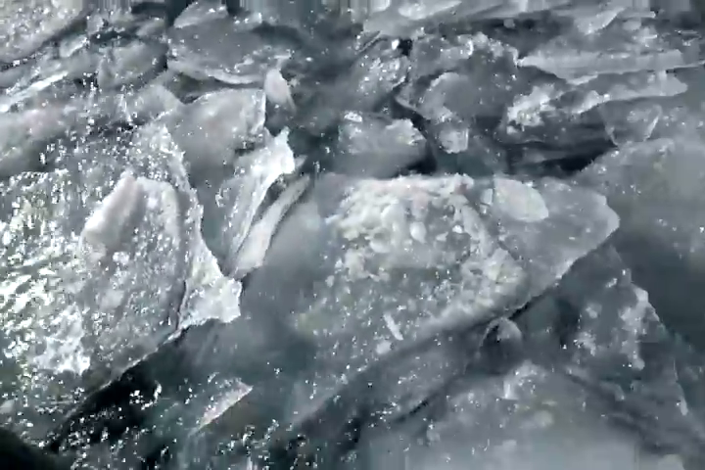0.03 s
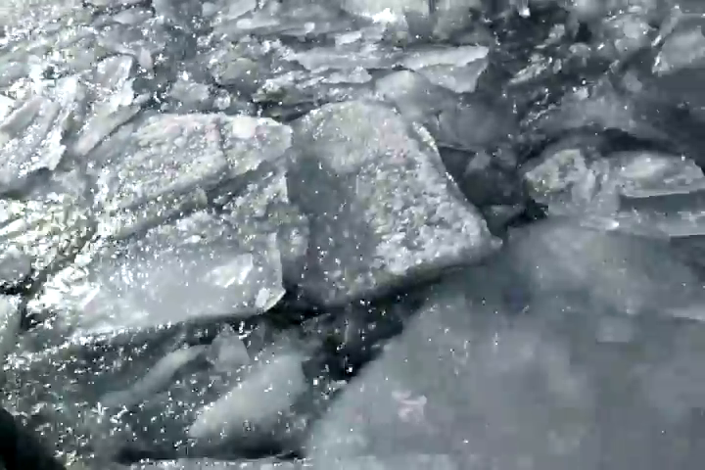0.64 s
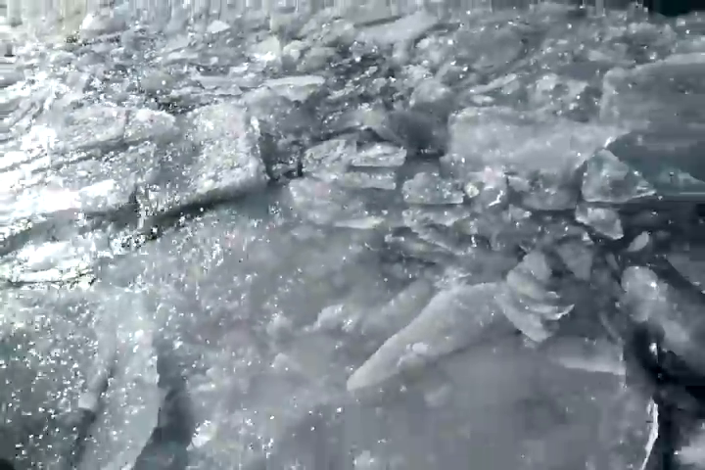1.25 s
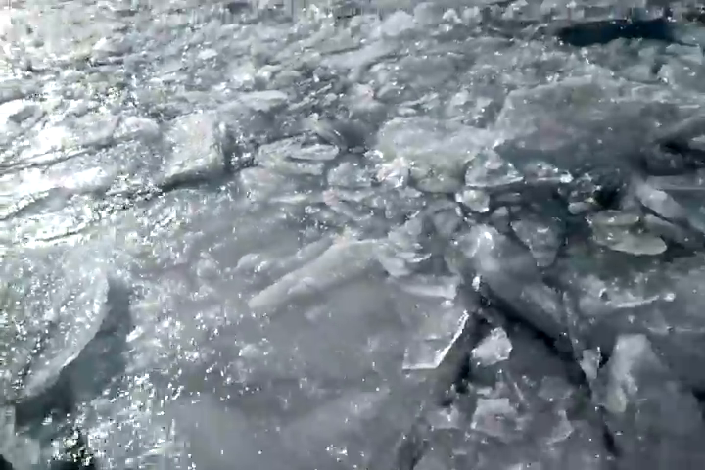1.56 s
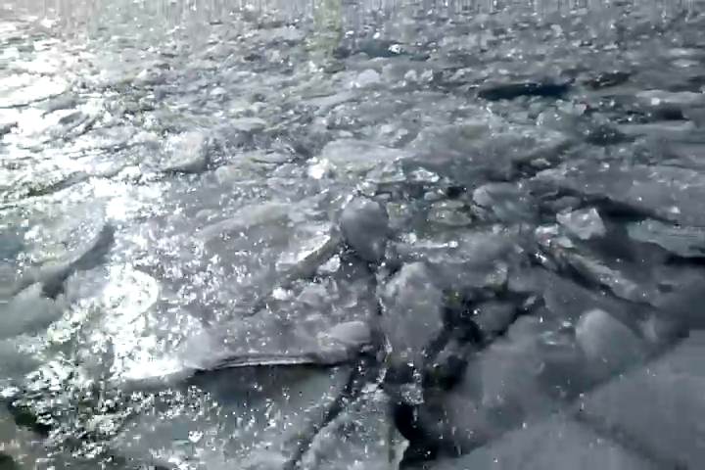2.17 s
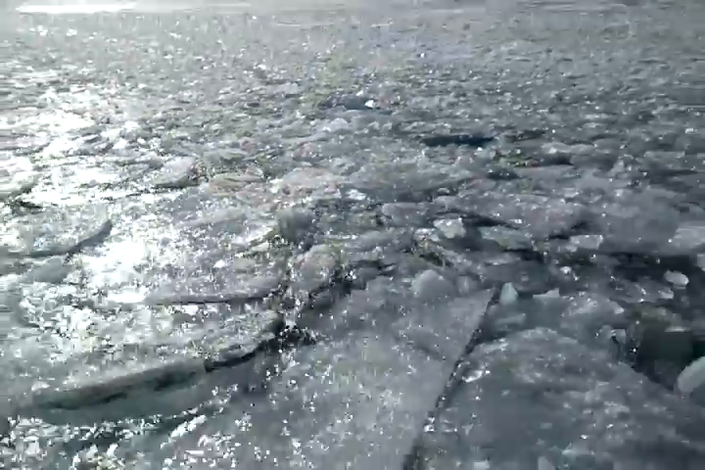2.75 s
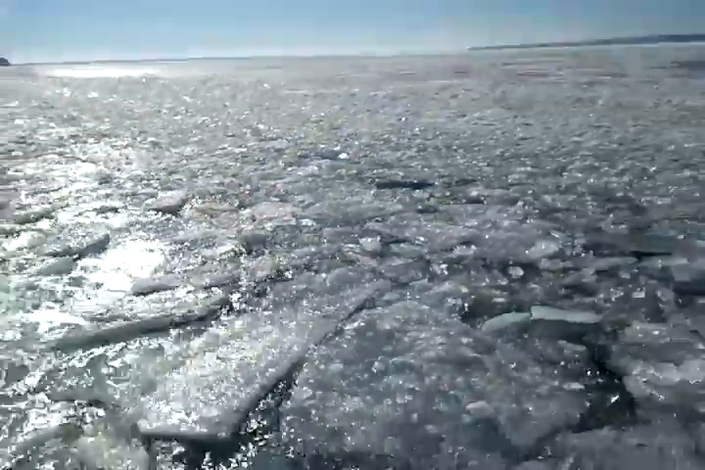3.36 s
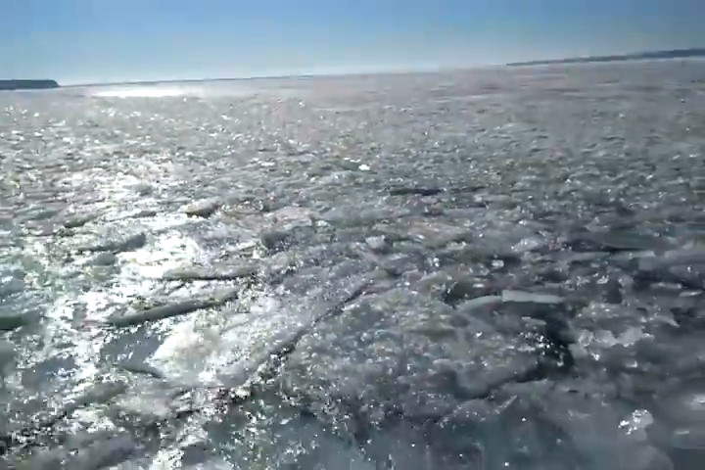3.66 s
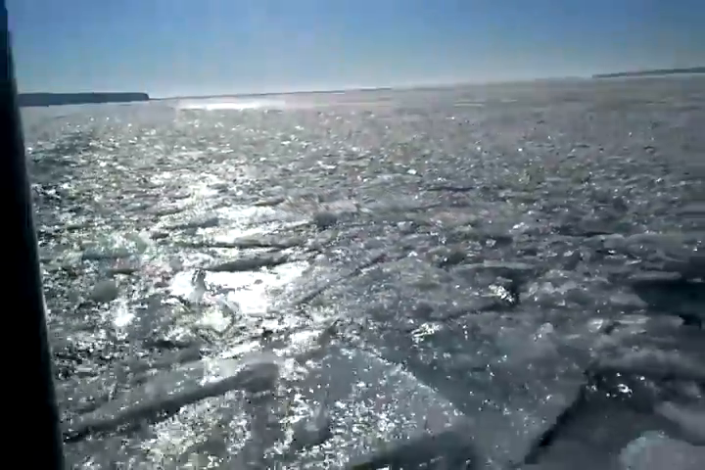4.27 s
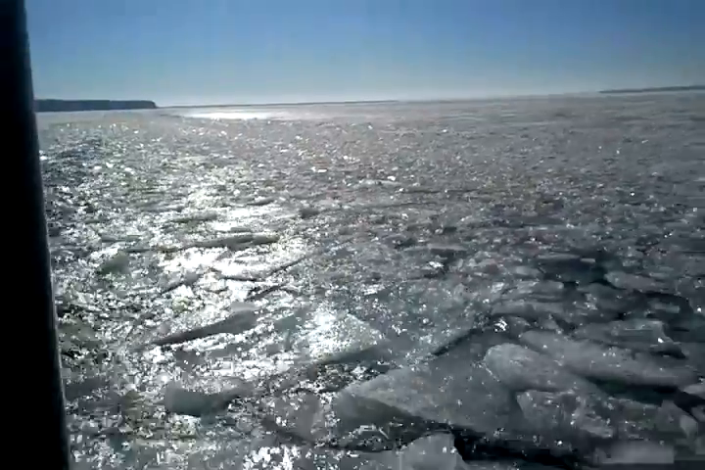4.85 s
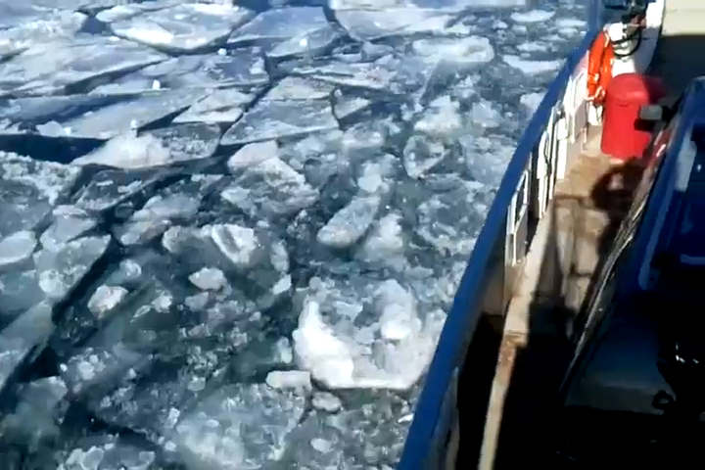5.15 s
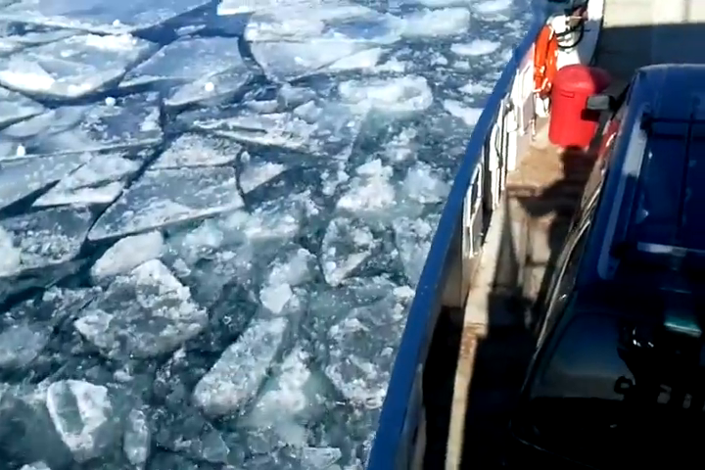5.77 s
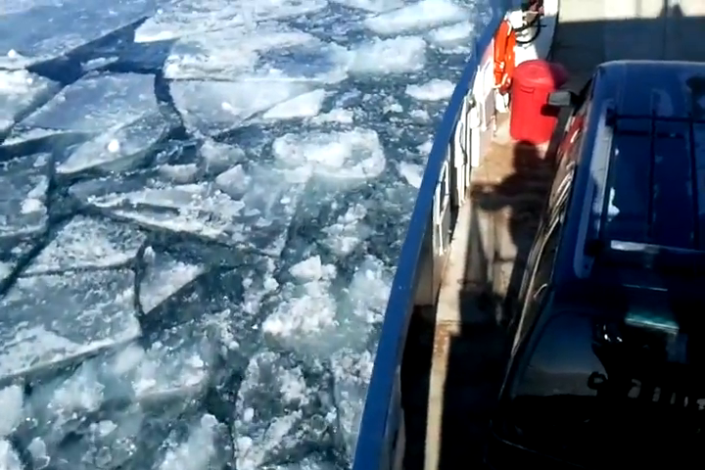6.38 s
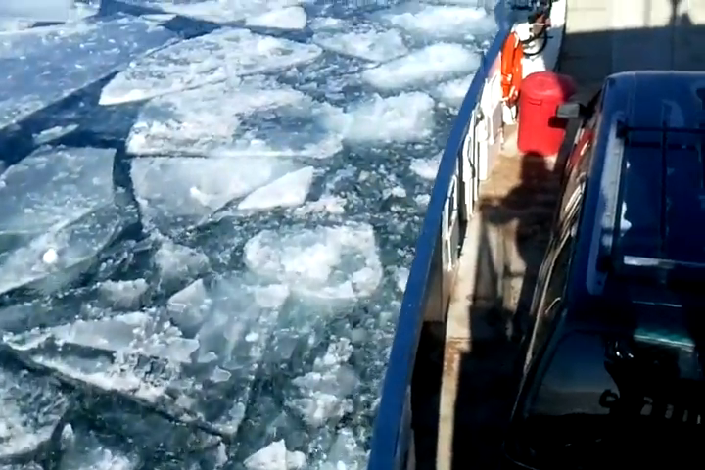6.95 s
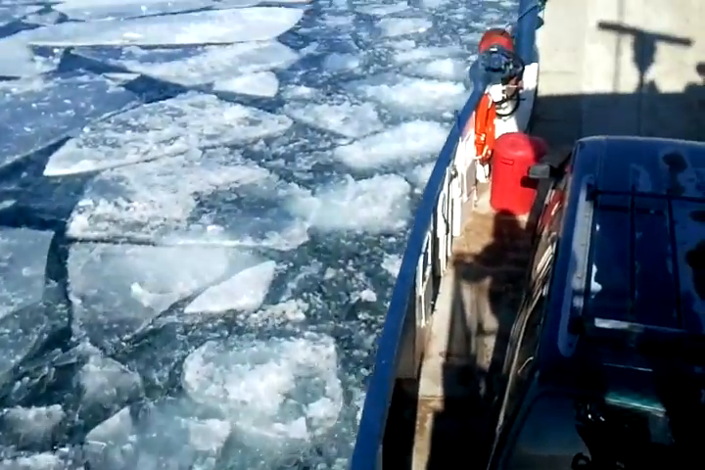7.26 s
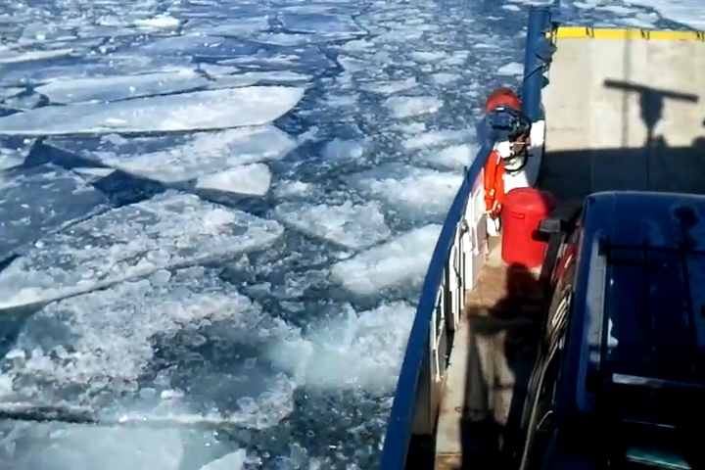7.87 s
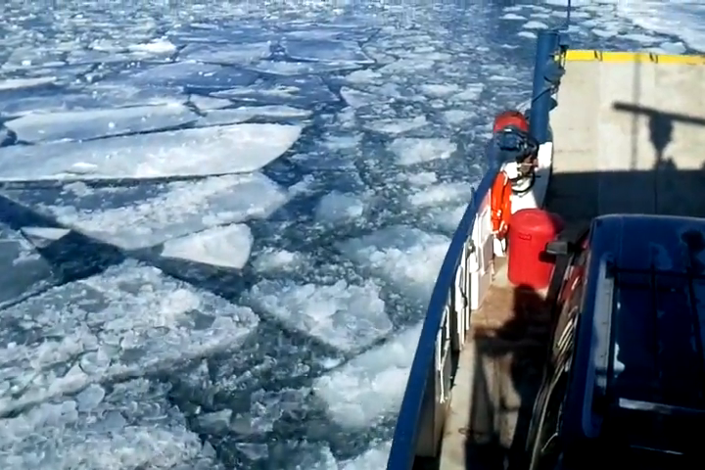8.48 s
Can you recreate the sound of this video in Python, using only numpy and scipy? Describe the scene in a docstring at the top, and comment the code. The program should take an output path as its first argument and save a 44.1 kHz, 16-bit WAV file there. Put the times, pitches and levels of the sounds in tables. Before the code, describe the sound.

Heard from the deck of a ferry on an icy lake, crushing floes and tinkling slush mix with thumping wind on the microphone, engine drone and a thin whine. Thick blocks scrape and knock on the bow just before a brief silent break. Then, out of the wind, a loud steady wash of broken ice and fizzing foam streams along the hull, with faint squeals and a low rumble underneath.

```python
"""Ferry in broken lake ice

From the deck, two positions with a silent break between. At the bow, wind buffets the microphone
over the diesel's rumble and the machinery's whine while floes crush and tinkle against the stem.
Along the side, out of the wind, slush rushes loudly past the hull and a raft of floes rubs the plating.
Gain control and a limiter hold down the peaks, and the top octave is cut."""
import sys
import numpy as np
from scipy import signal
from scipy.fft import rfft, irfft, next_fast_len
from scipy.io import wavfile
from scipy.ndimage import uniform_filter1d, minimum_filter1d

SR = 44100
rng = np.random.default_rng(int(sys.argv[2]) if len(sys.argv) > 2 else 0)


def wav_record(signal):
    """Record a signal, one row per channel, as 16-bit PCM in the file named by sys.argv[1]."""
    frames = np.transpose(np.atleast_2d(signal))
    bounded = np.clip(frames, -1, 1)
    # unit amplitude maps onto the largest positive 16-bit level
    quanta = np.round(bounded * 32767).astype(np.int16)
    wavfile.write(sys.argv[1], SR, quanta)


N = 380141
TIME = np.arange(N) / SR
BOW_END_S, SIDE_START_S = 5.078, 5.718


# Slush at the stem, heard from the deck above: (frequency [Hz], relative level [dB])
BOW_WASH_SPECTRUM = [(150, -32.5), (400, -7.5), (800, 2), (1250, 1), (1750, 3.5), (2200, 1), (2600, -5),
                     (3300, -8), (4300, -6.5), (4800, -3), (5250, -0.5), (5800, -8), (6500, -14.5),
                     (7300, -27.5)]
# Its rise and fall: (time [s], level [dB])
BOW_WASH_LEVELS = [(.55, -27), (.9, -22.5), (1.15, -23.5), (1.27, -23), (1.38, -21.5), (2.2, -21.5),
                   (3.5, -21.5), (3.97, -18.5), (4.25, -20), (4.7, -22.5), (5.05, -22.5)]
def bow_wash():
    """The stem pushes through water full of tinkling ice chips."""
    level_db, = curves(BOW_WASH_LEVELS)
    chips = shards(per_s=2500, spread_db=3, cycles=15)
    return undb(level_db) * slush(BOW_WASH_SPECTRUM, chips, water_db=13, churn_db=0.58, churn_hz=30)


# Slush and its foam, close below the side rail: (frequency [Hz], relative level [dB])
SIDE_WASH_SPECTRUM = [(120, -26), (340, -5.5), (520, -5), (800, -7.5), (1200, -4.5), (1700, -4),
                      (2200, -5.5), (2700, -10), (3400, -15), (4400, -19), (6500, -34)]
FOAM_SPECTRUM = [(2500, -15), (3600, -12.5), (4300, -7), (4800, -4.5), (5200, -2.5), (5700, -8),
                 (6300, -14.5), (6900, -20.5), (7300, -31)]
def side_wash():
    """Broken ice and foam stream along the plating, swelling once as water spills over a tipping floe."""
    chips = shards(per_s=6000, spread_db=1.95, cycles=5.4)
    wash = slush(SIDE_WASH_SPECTRUM, chips, water_db=5.5, churn_db=0.9, churn_hz=12)
    bubbles = shards(per_s=7000, spread_db=1.8, cycles=3.6)
    foam = slush(FOAM_SPECTRUM, bubbles, water_db=6, churn_db=-0.15, churn_hz=9.5)
    spill = 1 + 0.36 * swell(start_s=8.05, length_s=0.36, attack_s=0.26, release_s=0.13)
    return spill * (undb(-15.5) * wash + undb(-18.5) * foam)


# Ice crushing along the hull, at bow and side alike: (frequency [Hz], relative level [dB])
CRUSH_SPECTRUM = [(500, -14), (1000, -8.5), (1400, -8), (1750, -3), (2300, -3.5), (2650, -9), (3300, -15),
                  (4200, -23), (6000, -31)]
# The floe at the stem catches and lurches: (start [s], length [s], added level [dB])
LURCHES = [(0.145, 0.047, 4), (.275, 0.064, 2.5), (.385, .04, 1.5), (1.04, 0.15, 2.5)]
def grinding_floe(start_s=-0.02, length_s=1.3, ease_db_per_s=2.5, climb_hz_per_s=950):
    """One floe crushes along the stem in lurches, easing off, with a rasp that climbs as it slides."""
    slid_s = np.clip(TIME - start_s, 0, length_s)
    chips = shards(per_s=3000, spread_db=0.63, cycles=25)
    crushing = slush(CRUSH_SPECTRUM, chips, water_db=7, churn_db=-0.6, churn_hz=24)
    rasping = undb(-9.5) * rasp(2588 + climb_hz_per_s * slid_s, width_hz=870)
    lurch_db = sum(db * swell(s, length, attack_s=0.02, release_s=0.015) for s, length, db in LURCHES)
    contact = swell(start_s, length_s, attack_s=0.018, release_s=0.028)
    return undb(-19.5 + lurch_db - ease_db_per_s * slid_s) * contact * (crushing + rasping)


# Dull squeals below the side rail: (start [s], length [s], level [dB])
SQUEALS = [(5.95, .3, -27), (6.55, .17, -28), (7.0, 0.27, -28), (8.28, 0.12, -26)]
def rubbing_raft(start_s=5.19, length_s=2.03, level_db=-18):
    """A raft of floes rubs along the side plating and squeals now and then."""
    pressure = surges([(start_s, length_s, level_db)], steady_db=-27, attack_s=0.65, release_s=0.55)
    chips = shards(per_s=4000, spread_db=3.3, cycles=16)
    crushing = slush(CRUSH_SPECTRUM, chips, water_db=14.5, churn_db=-2.8, churn_hz=8)
    rasping = undb(-7) * rasp(2350, width_hz=740)
    squeal_gain = surges(SQUEALS, steady_db=-33.5, attack_s=0.09, release_s=0.08)
    return pressure * (crushing + rasping) + squeal_gain * rasp(2243, width_hz=250)


# Low crunch from under the bow: (frequency [Hz], relative level [dB])
CRUNCH_SPECTRUM = [(80, -29.5), (170, -2.5), (260, -2), (400, -6.5), (640, -13), (900, -20), (1600, -35.5)]
# Floes bear on the stem: (start [s], length [s], level [dB])
PRESSES = [(.12, 0.18, -24), (0.838, 0.15, -29.5), (3.155, 0.25, -23.5), (4.07, 0.16, -19.5),
           (4.352, 0.3, -14.5), (4.754, 0.079, -21.5)]
def crunching_floes():
    """Thick floes nudge the hull all the while; now and then one presses on the stem and crumbles."""
    lumps = shards(per_s=700, spread_db=2.5, cycles=2.5, low_hz=131.4, high_hz=1040, pitches=10)
    pressure = surges(PRESSES, steady_db=-23, attack_s=0.047, release_s=0.22)
    return pressure * slush(CRUNCH_SPECTRUM, lumps, water_db=13.5, churn_db=0, churn_hz=30)


# Floe edges scrape off the bow, with two high hissing swells of spray:
# (start [s], length [s], level [dB], pitch [Hz])
SCRAPES_AND_SPRAY = [(1.373, 0.05, -25, 1910), (2.33, 0.14, -28, 5130), (3.376, 0.13, -31.5, 5260),
                     (4.04, .011, -14, 2010), (4.057, .009, -9, 1850), (4.14, 0.0073, -23, 1990),
                     (4.162, 0.022, -16.5, 2230), (4.23, 0.028, -20.5, 2030), (4.265, 0.065, -23, 1740),
                     (4.398, 0.02, -20.5, 2030), (4.448, .012, -19.5, 1640), (4.785, 0.036, -29, 2000),
                     (4.931, 0.062, -27.5, 1800), (5.006, 0.0093, -25, 2090)]
# The fine crackle in each: (frequency [Hz], relative level [dB])
CRACKLE_SPECTRUM = [(550, 2), (1200, 2.5), (1900, -8), (3300, -2.5), (5200, -3.5), (6500, -16.5)]
def scrapes_and_spray(width_hz=900):
    """Dense ticks ring near 2 kHz where floe edges bite and crumble, and hiss near 5 kHz as spray."""
    ticks = shards(per_s=6000, spread_db=1.7, cycles=2.3, low_hz=808, high_hz=6000, pitches=14)
    crackle = undb(-3) * colour(ticks, CRACKLE_SPECTRUM)
    out = np.zeros(N)
    for start, length, db, hz in SCRAPES_AND_SPRAY:
        band = unit(ring(ring(ticks, hz, width_hz), hz, width_hz))
        out += undb(db) * swell(start, length, attack_s=0.0044, release_s=0.006) * unit(band + crackle)
    return out


# Thick blocks knock on the bow: (time [s], level [dB], ring [Hz], decay [s])
KNOCKS = [(4.16, -9, 360, .008), (4.396, -9, 480, .005), (4.427, -14, 480, .007), (4.441, -11, 620, .007),
          (4.49, -9, 480, .005), (4.535, -12, 540, .007), (4.557, -14, 497, .007), (4.63, -12, 600, .005),
          (4.685, -11, 480, .007), (4.822, -11, 420, .007), (4.882, -10, 560, .006),
          (4.601, -3, 680, .0045)]
# Thin ice snaps, heard from both positions: (time [s], level [dB], ring [Hz], decay [s])
SNAPS = [(.1646, -17, 3400, .004), (.199, -13.5, 4500, .006), (.223, -21, 5800, .0025),
         (.3053, -12, 4800, .003), (.313, -16, 3000, .004), (.438, -18, 6000, .002),
         (1.5843, -19, 5100, .003), (2.2099, -18, 4960, .003), (2.611, -15, 4400, .003),
         (3.2276, -17, 5000, .003), (7.8357, -14, 4940, .003), (8.3226, -11, 5120, .004),
         (5.0412, -3, 4400, .0028)]
def splinters(events, width_hz, lowpass_hz=6200):
    """A floe snaps or knocks: a dying burst of splinters rings the ice plate, low for a thick one."""
    out, t = np.zeros(N), np.arange(SR // 5) / SR
    for time_s, db, hz, decay_s in events:
        fade = np.exp(-t / decay_s)
        crack = ring(rng.standard_normal(len(t)) * fade, hz, width_hz)
        burst = undb(-3) * crack + ring(crack, hz, width_hz)
        start = int(time_s * SR)
        out[start:start + len(t)] += undb(db) * unit(burst) * np.sqrt(np.mean(fade ** 2))
    return signal.sosfilt(signal.butter(10, lowpass_hz, fs=SR, output="sos"), out)


# Wind right on the microphone at the bow: (frequency [Hz], relative level [dB])
WIND_SPECTRUM = [(10, -28), (22, -14.5), (40, -3.5), (58, 0), (78, 1.5), (115, 0.5), (140, -5.5),
                 (175, -10.5), (260, -17.5), (450, -23), (1000, -42)]
# Gusts that thump it: (start [s], length [s], level [dB], eddy pitch [Hz])
GUSTS = [(0.422, 0.17, -15.5, 110), (0.683, .08, -14.5, 88), (1.152, 0.15, -4.5, 87.6),
         (1.387, 0.12, -12, 80), (1.545, 0.27, -13.5, 70), (2.33, 0.14, -20, 80.5),
         (2.457, 0.27, -13.5, 98), (2.724, .22, -16.5, 95), (3.134, 0.15, -16, 69), (3.594, 0.12, -7, 84),
         (3.726, 0.24, -5, 80), (3.809, 0.096, -5, 138), (3.933, 0.044, -1.5, 68.6),
         (4.002, 0.12, -4.5, 72), (4.158, 0.042, -7.5, 78), (4.235, 0.14, -7.5, 70), (4.41, 0.29, -9, 85),
         (4.7, 0.031, -10, 89), (4.8, 0.076, -12, 85), (5.005, 0.071, -11.5, 95)]
def wind(breeze_db=-17.5, eddy_width_hz=48):
    """The steady breeze of the ship's way, and gusts that each shed eddies flapping at their own pitch."""
    air = colour(rng.standard_normal(N), WIND_SPECTRUM)
    stir = rng.standard_normal(N)
    out = undb(breeze_db) * colour(rng.standard_normal(N), WIND_SPECTRUM)
    for start, length, db, hz in GUSTS:
        eddies = unit(ring(ring(stir, hz, eddy_width_hz), hz, eddy_width_hz))
        gust = swell(start, length, attack_s=0.035, release_s=0.044)
        out += undb(db) * gust * unit(air + undb(-1) * eddies)
    return out


# The hull, heard from the side rail: (frequency [Hz], relative level [dB])
RUMBLE_SPECTRUM = [(12, -31), (22, 0.5), (42, -2.5), (60, -3.5), (88, -2.5), (135, -1.5), (190, -3.5),
                   (270, -6.5), (400, -15), (800, -14.5)]
def hull_rumble():
    """The hull rumbles low and steadily under the wash."""
    return undb(-15) * colour(rng.standard_normal(N), RUMBLE_SPECTRUM)


# The engine, heard on deck: (multiple of the shaft rate, bow level [dB], side level [dB])
HARMONICS = [(3, -29.5, -31), (4, -36, -25.5), (5, -35, -24.5), (6, -31.5, -26.5), (7, -25.5, -44.5),
             (12, -26, -33.5), (14, -35, -33.5), (15, -31, -30.5), (20, -29, -42.5)]
# The plating booms with one harmonic: (start [s], length [s], multiple of the shaft rate, level [dB])
BOOMS = [(0.55, 0.83, 20, -27), (2.354, 0.47, 20, -25), (2.98, 0.61, 20, -25), (4.599, 0.42, 20, -21),
         (6.301, 1.07, 12, -21), (6.95, .55, 6, -18.5), (7.747, 0.4, 6, -21), (8.3, 0.18, 6, -14)]
def diesel(at_bow, shaft_hz=10.92, throb_db=2.5, stray_cycles=0.047):
    """Harmonics of the shaft rate, each throbbing and straying as ice loads the propeller."""
    turns = np.cumsum(shaft_hz * (1 + 0.00499 * walk(0.82))) / SR
    out = np.zeros(N)
    for multiple, bow_db, side_db in HARMONICS:
        booms = [(start, length, db) for start, length, k, db in BOOMS if k == multiple]
        gain = surges(booms, steady_db=bow_db if at_bow else side_db, attack_s=0.31, release_s=0.052)
        cycles = multiple * turns + rng.random() + stray_cycles * walk(11)
        out += gain * unit(undb(throb_db * walk(12)) * np.sin(2 * np.pi * cycles))
    return out


# Machinery behind the ice at the bow: (time [s], low tone [dB], middle tone [dB], top tone [dB])
WHINE_LEVELS = [(0, -42.5, -45, -40), (.17, -32, -44, -36.5), (.45, -27.5, -44, -35.5),
                (.85, -35.5, -43, -34.5), (1.08, -29, -44, -36.5), (1.3, -38, -43, -43),
                (1.97, -26.5, -32.5, -35), (2.25, -33.5, -32.5, -33), (2.45, -30, -37, -38),
                (2.87, -27, -33.5, -39), (3.04, -35, -33, -44.5), (3.35, -32, -32, -33.5),
                (3.65, -30.5, -31, -35), (3.98, -32.5, -27, -52), (4.35, -35, -33, -43),
                (5, -35.5, -35.5, -41.5)]
def machinery(at_bow, low_hz=746, middle_hz=1075, top_hz=2176):
    """Turning machinery whines in three tones at the bow; only the top one is heard along the side."""
    if not at_bow:
        return whine(top_hz, db=-36.5, waver_hz=8.15, flutter_db=3)
    low_db, middle_db, top_db = curves(WHINE_LEVELS)
    return (whine(low_hz, low_db, waver_hz=7, flutter_db=4)
            + whine(middle_hz, middle_db, waver_hz=10, flutter_db=3.5)
            + whine(top_hz, top_db, waver_hz=5, flutter_db=3))


def whine(hz, db, waver_hz, flutter_db):
    """One machinery tone that wavers and flutters in the moving air."""
    phase = 2 * np.pi * np.cumsum(hz + waver_hz * walk(16.43)) / SR
    return undb(db) * unit(undb(flutter_db * walk(22)) * np.sin(phase))


def shards(per_s, spread_db, cycles, low_hz=500, high_hz=7000, pitches=28):
    """Countless ice chips and bubbles: lone ticks of uneven size, each ringing briefly at its pitch."""
    out = np.zeros(N)
    ticks_per_pitch = int(per_s * N / SR / pitches)
    for hz in np.geomspace(low_hz, high_hz, pitches):
        when, chance, sign = rng.random((4000, 3))[:ticks_per_pitch].T
        size = np.minimum(-np.log(1 - chance), 5)  # many small, few large
        ticks = np.bincount((when * N).astype(int), undb(spread_db * size) * np.sign(sign - 0.5), N)
        out += ring(ticks, hz, hz / cycles)
    return unit(out)


def slush(spectrum, chips, water_db, churn_db, churn_hz):
    """Tinkling chips in the smooth rush of water, swelling as the floes turn over."""
    rush = chips + undb(water_db) * rng.standard_normal(N)
    return colour(rush, spectrum) * undb(churn_db * walk(churn_hz))


def rasp(hz, width_hz):
    """Chattering contact spreads a squeal into a broad hump with soft flanks."""
    chatter = signal.lfilter(*signal.butter(1, width_hz / 2, fs=SR), walk(2500))
    phase = 2 * np.pi * np.cumsum(hz * np.ones(N)) / SR
    return unit(chatter * np.sin(phase))


def swell(start_s, length_s, attack_s, release_s):
    """Gain that rises, holds until the length is up, then dies away."""
    t = TIME - start_s
    return np.clip(t / attack_s, 0, 1) * np.exp(-np.maximum(t - length_s, 0) / release_s)


def surges(events, steady_db, attack_s, release_s):
    """Gain of a steady level with swells on top; their powers add."""
    power = sum((undb(db) * swell(s, length, attack_s, release_s)) ** 2 for s, length, db in events)
    return np.sqrt(undb(steady_db) ** 2 + power)


def ring(x, hz, width_hz):
    """One damped resonance."""
    return signal.lfilter(*signal.iirpeak(hz, hz / width_hz, fs=SR), x)


def colour(x, spectrum):
    """Shape a sound by (Hz, dB) points, falling 20 dB an octave beyond both ends; rms 1."""
    size = next_fast_len(N)
    octave = np.log2(np.arange(size // 2 + 1) * SR / size + 1)
    hz, db = np.transpose(spectrum)
    knots = np.log2(hz)
    outside = np.maximum(knots[0] - octave, 0) + np.maximum(octave - knots[-1], 0)
    gain = undb(np.interp(octave, knots, db) - 20 * outside)
    return unit(irfft(rfft(x, size) * gain, size)[:N])


def walk(rate_hz):
    """Smooth random drift of rms 1 that changes about rate_hz times a second."""
    size = next_fast_len(N)
    hz = np.arange(size // 2 + 1) * SR / size
    return unit(irfft(rfft(rng.standard_normal(size)) / (1 + (hz / rate_hz) ** 4), size)[:N])


def curves(table):
    """The columns of a table, joined by straight lines in time."""
    times, *columns = np.transpose(table)
    return [np.interp(TIME, times, column) for column in columns]


def undb(db):
    """Decibels to gain."""
    return 10 ** (np.asarray(db) / 20)


def unit(x):
    """Scale to rms 1."""
    return x / np.sqrt(np.mean(x ** 2))


def scene(hiss_s=0.052):
    """One microphone: the bow stops with a wisp of hiss, and after the silence the side fades in."""
    bow = bow_wash() + crunching_floes() + machinery(at_bow=True)
    bow += scrapes_and_spray() + splinters(KNOCKS, width_hz=300)
    bow += diesel(at_bow=True) + grinding_floe() + wind()
    side = side_wash() + rubbing_raft() + hull_rumble() + diesel(at_bow=False) + machinery(at_bow=False)
    hiss = undb(-45) * rng.standard_normal(N) * (TIME >= BOW_END_S) * (TIME < BOW_END_S + hiss_s)
    fade_in = np.clip(0.35 + (TIME - SIDE_START_S) / 0.43, 0, 1) ** 2 * (TIME > SIDE_START_S)
    snaps = splinters(SNAPS, width_hz=4200)
    return (bow * (TIME < BOW_END_S) + hiss + side * fade_in + snaps)[None]


def record(dry, threshold_db=-11, listen_s=0.062, ratio=2.65, ceiling_db=-4, hold_s=0.006, top_hz=7250):
    """Gain control eases down the gusts, a fast limiter catches the peaks and the top is cut steeply."""
    rms = np.sqrt(np.abs(uniform_filter1d(dry ** 2, int(listen_s * SR))) + 1e-12)
    levelled = dry * np.minimum(1, undb(threshold_db) / rms) ** (1 - 1 / ratio)
    span = int(hold_s * SR)
    headroom = np.minimum(1, undb(ceiling_db) / (np.abs(levelled) + 1e-9))
    limited = levelled * uniform_filter1d(minimum_filter1d(headroom, span), span)
    return signal.sosfilt(signal.ellip(10, 0.2, 80, top_hz, fs=SR, output="sos"), limited)


dry = scene()
out = record(dry)
wav_record(out)
```